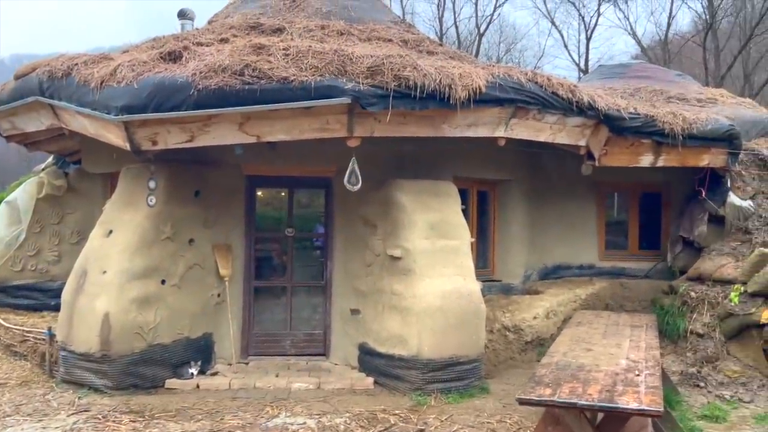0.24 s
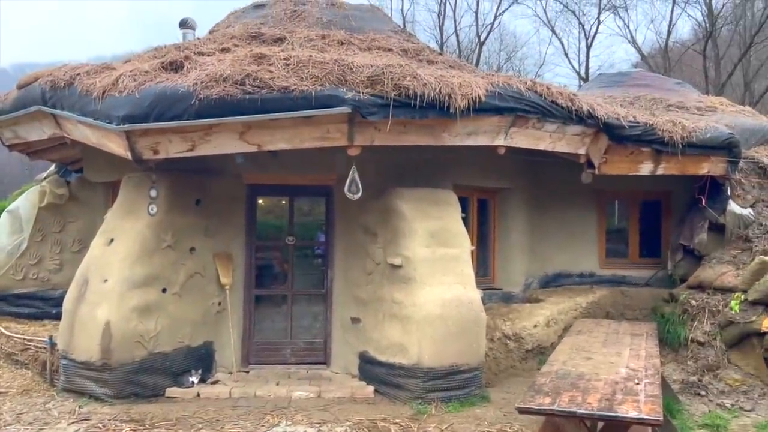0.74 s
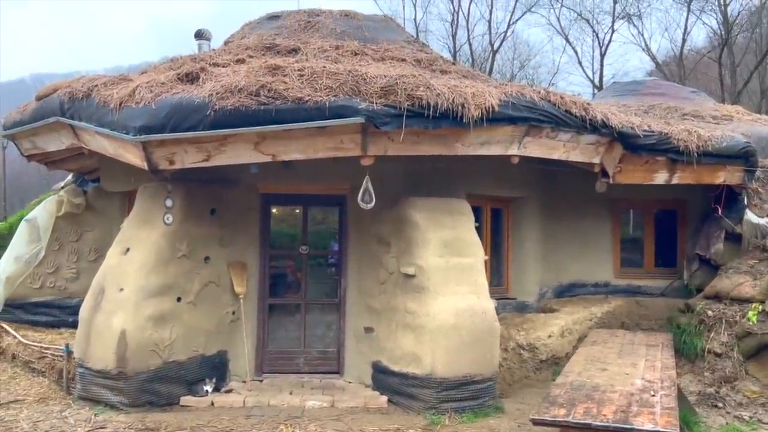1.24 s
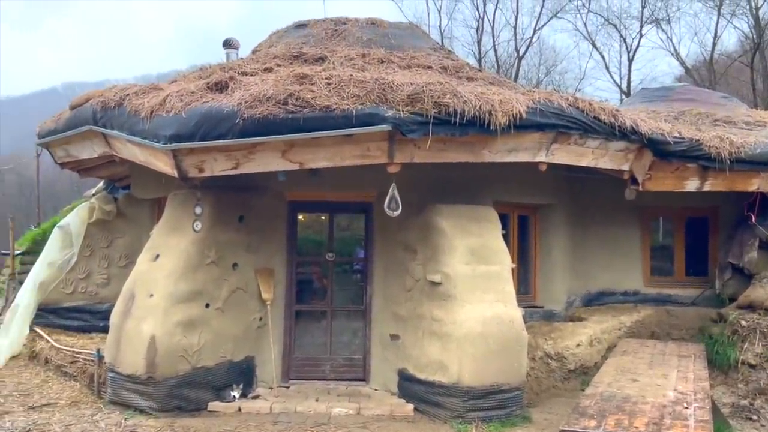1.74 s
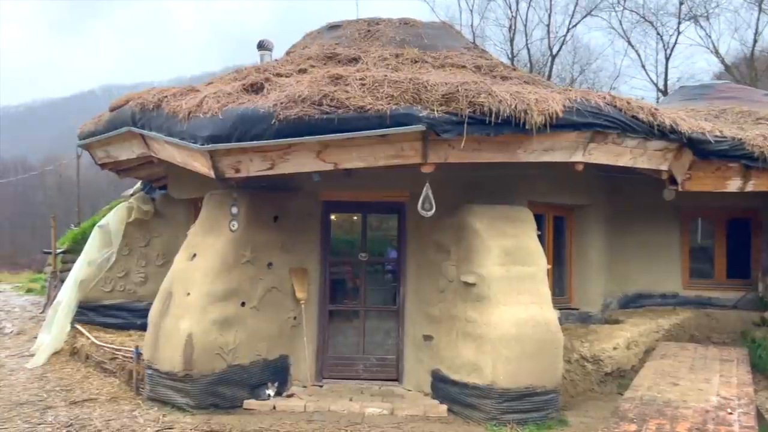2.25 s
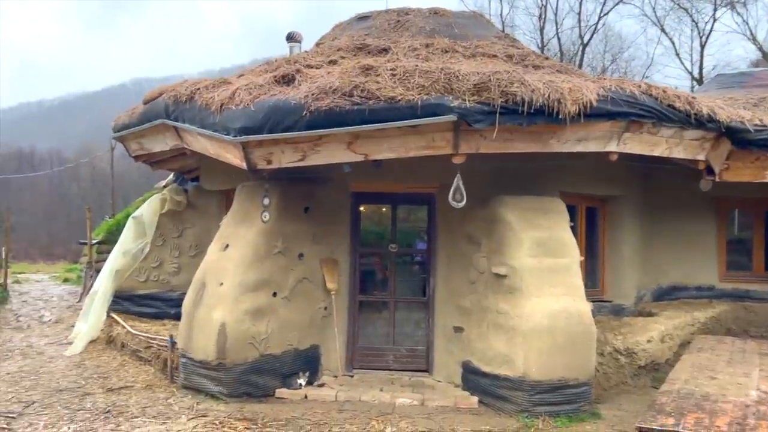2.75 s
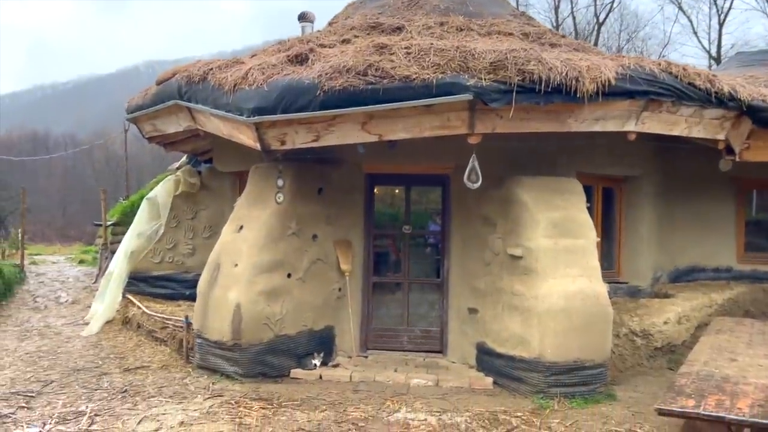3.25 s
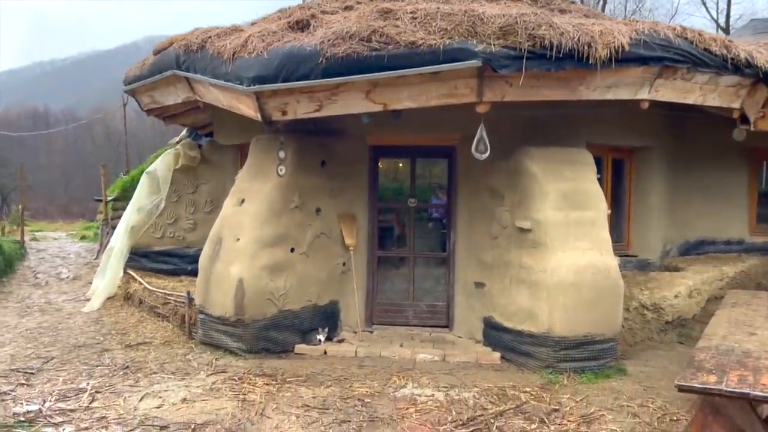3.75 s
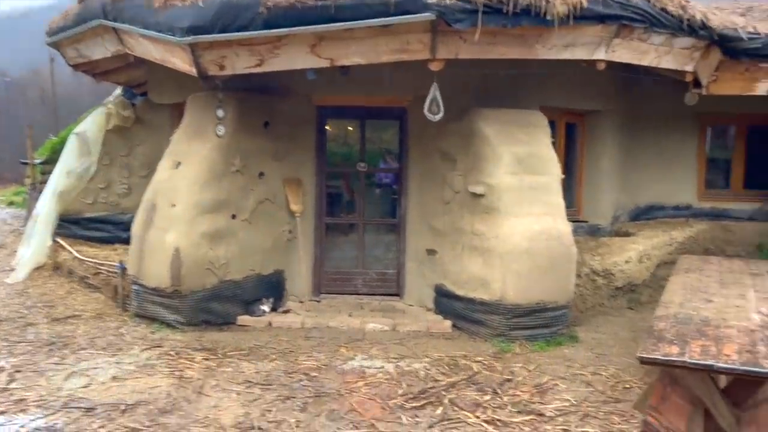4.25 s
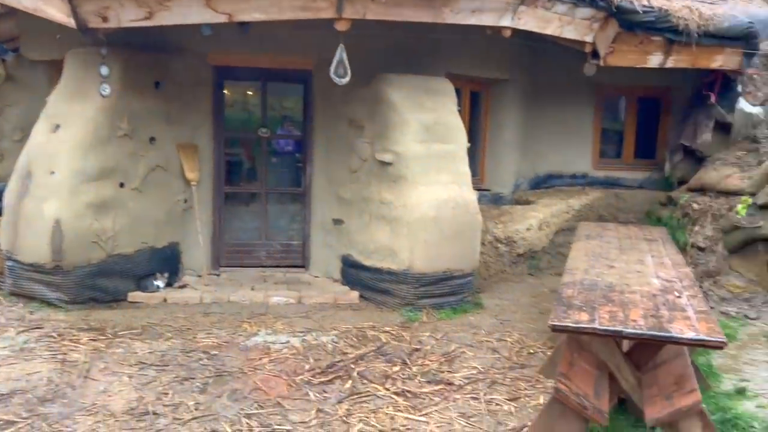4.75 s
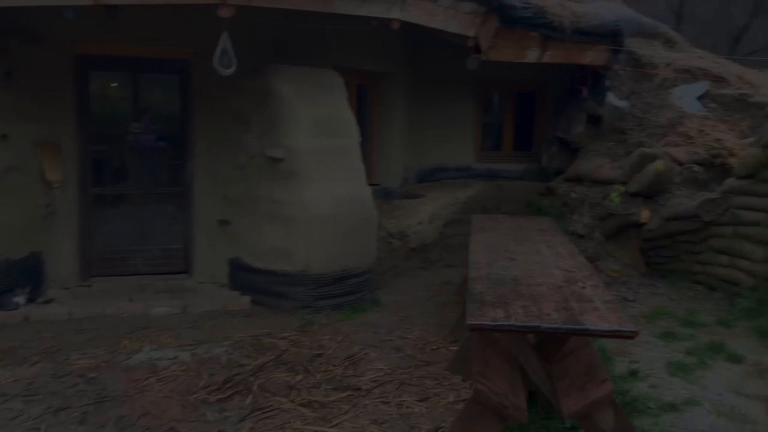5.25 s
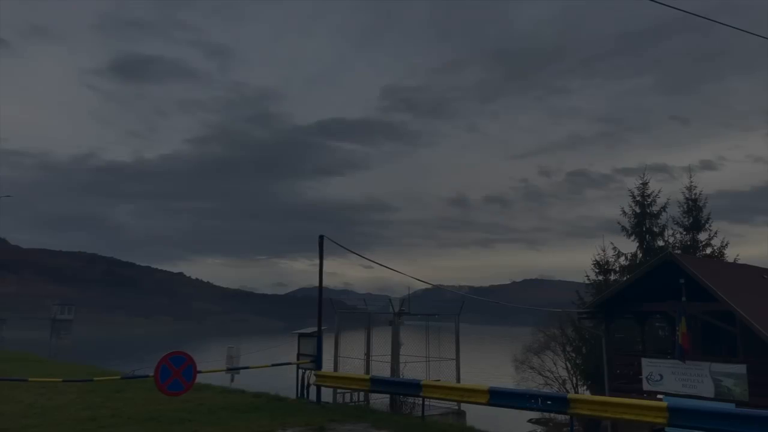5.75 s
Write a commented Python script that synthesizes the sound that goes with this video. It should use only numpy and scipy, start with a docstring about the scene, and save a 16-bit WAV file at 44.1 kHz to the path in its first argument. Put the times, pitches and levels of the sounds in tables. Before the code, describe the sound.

Close steps on wet, straw-strewn mud in a quiet yard. Faint low thumps and crisp wet ticks come first, then a heavy hollow step at two seconds. Wind bumps the microphone mid-way. A sole drags with a swish and squelch before another firm step, then again around the next. A last step lands as a broad outdoor wash flicks in, dips and swells.

```python
"""Someone walks over wet, straw-strewn mud outdoors. From the start, noise makes a soft air hiss and wind rumble,
with slow swings for wind buffets and a faint crackling hiss for settling straw. Footfalls begin at once: ringing
sine waves and lumpy, dying noise. Wet ticks soon follow, short snaps with a fizz; then come dull pops of one swing,
the second over a short low thump built like a footfall, and squelches of narrow noise. From 3.6 s a dragged sole
swishes twice in patchy, crackling noise. Near the end a broad outdoor wash of noise bursts briefly, dips and swells."""
import sys
import numpy as np
from scipy import signal
from scipy.io import wavfile

SR = 44100
rng = np.random.default_rng(int(sys.argv[2]) if len(sys.argv) > 2 else 0)


def dump_mix(stems):
    """Bounce the given channels to the path in sys.argv[1] as a 16-bit WAV at rate SR."""
    frames = np.atleast_2d(stems).T  # one column per channel
    limited = np.clip(frames, -1, 1)  # hard clip at full scale
    pcm = np.round(limited * 32767).astype(np.int16)
    wavfile.write(sys.argv[1], SR, pcm)


N = 264600   # samples: 6 s

# Colour of the still outdoor air: (pitch [Hz], relative level [dB per Hz])
AIR_COLOUR = [(59, -23.5), (100, -7.5), (141, -9.5), (263, -6), (330, -13), (641, -14.5), (1370, -18),
              (1500, -18.5), (2330, -16.5), (4110, -28), (5160, -35.5), (7120, -29.5), (9280, -36.5),
              (12100, -68), (20400, -120)]
AIR_DB = -69.5
# Loudness of the late wash: (time [s], level [dB])
WASH_LEVEL = [(5.45, -52), (5.484, -83), (5.608, -57.5), (5.824, -52), (6.0, -50.5)]
# Colour of the late wash: (pitch [Hz], relative level [dB per Hz])
WASH_COLOUR = [(59, -30), (100, -2.5), (194, -7.5), (295, -4.5), (356, -16.5), (666, -3), (1390, -8),
               (3330, -20.5), (5890, -19), (9280, -34), (12100, -94), (20400, -120)]
# How alike left and right are for far sounds, held to -1..1: (pitch [Hz], likeness [-])
FAR_ALIKE = [(60, 1), (210, 0.36), (730, -0.6), (2540, 0.15), (8830, -1.2)]
# The same for near sounds: (pitch [Hz], likeness [-])
NEAR_ALIKE = [(60, 0.76), (250, 1), (700, 0.41), (3000, 0.43), (9000, 0.55)]

# Wind on the microphone, before the lumps: (time [s], rumble level [dB])
WIND_LEVEL = [(0, -73), (.9, -75), (1.7, -72), (2.3, -59.5), (2.6, -56), (3.0, -58.5), (3.3, -66.5),
              (3.8, -49.5), (4.05, -59.5), (4.7, -67), (5.1, -60.5), (5.4, -64), (6, -69)]
# Colour of the wind rumble: (pitch [Hz], relative level [dB per Hz])
RUMBLE_COLOUR = [(12, -42), (20, -16), (47, 12.5), (70, 7.5), (123, -7), (168, -17), (219, -23),
                 (252, -43.5), (400, -59), (520, -73), (880, -120)]
LUMPY_DB, LUMPS_PER_S = 5.5, 8.3   # spread and rate of the wind's lumps
# Stronger buffets, a few slow swings each:
# (time of the middle [s], level [dB], half length [s], swing rate before the wobble [Hz])
BUFFETS = [(0.203, -52, 0.011, 89.6), (0.786, -62, 0.023, 64.6), (1.025, -59, 0.024, 79),
           (1.207, -58, 0.018, 63.5), (1.739, -54, 0.034, 66.9), (2.243, -68, .035, 56.3),
           (2.331, -48.5, 0.023, 59), (2.449, -41.5, 0.035, 57.5), (2.544, -39.5, 0.034, 76.1),
           (2.579, -33, 0.021, 65.6), (2.633, -37.5, 0.007, 70.1), (2.729, -44, 0.036, 65.9),
           (2.917, -42, 0.035, 58), (3.158, -51.5, 0.017, 61.4), (3.447, -53, 0.031, 59.7),
           (3.524, -41, 0.037, 74.9), (3.607, -48.5, 0.09, 59.4), (3.749, -36.5, 0.028, 67.7),
           (3.802, -35, 0.016, 72), (3.868, -32.5, 0.014, 78), (3.917, -45, 0.021, 52),
           (4.28, -56.5, .025, 64), (4.451, -54.5, .025, 66.7), (4.93, -45.5, 0.045, 64.5),
           (5.125, -58, 0.032, 65), (5.196, -50, 0.013, 61.3), (5.744, -55.5, 0.019, 77.6),
           (5.912, -54, 0.036, 74.9)]

# Settling straw, before its crackle: (time [s], level [dB])
RUSTLE_LEVEL = [(0.0, -81.5), (2.2, -79.5), (2.32, -84.5), (3.5, -79), (4.07, -69), (5.1, -76),
                (5.4, -72.5), (5.6, -70)]
# Dull pops in the mud: (time [s], peak level [dB], centre [Hz], left-right difference [dB])
POPS = [(1.844, -48.5, 1450, 10), (2.9957, -46.5, 502, -5)]
# Air squeezed out of the mud:
# (time of the peak [s], level [dB], centre [Hz], length [s], left-right difference [dB])
SQUELCHES = [(2.217, -71, 4300, 0.019, 0), (3.705, -64, 4000, 0.017, 2), (3.821, -71, 1070, 0.055, 18),
             (3.941, -56, 1640, 0.029, 13.5), (3.955, -55.5, 3380, 0.039, 4),
             (4.006, -54, 3230, 0.0076, -11), (4.285, -75, 6400, 0.034, -8.5),
             (4.941, -59.5, 3800, 0.04, 1), (5.05, -66, 1639, 0.027, 17), (5.187, -75, 5930, 0.011, -8)]

# The dragged sole, one list per drag: (time [s], level [dB])
DRAG_LEVELS = [
    [(3.62, -87), (3.7, -66.5), (3.76, -69), (3.79, -59), (3.9, -60.5), (3.95, -53), (4.04, -51.5),
     (4.16, -79)],
    [(4.84, -60.5), (4.92, -57), (4.95, -51), (4.99, -57), (5.12, -66), (5.16, -72.5)],
]
# Colour of the drag: (pitch [Hz], relative level [dB per Hz])
SWISH_COLOUR = [(290, -49), (500, -14), (921, -5.5), (1280, -9.5), (1540, -11.5), (2390, -7.5), (3200, -9),
                (4920, -13), (7180, -10.5), (9280, -41), (12100, -67), (20400, -120)]
# Stalks crackle on their own between these: (edge [Hz])
STALK_EDGES_HZ = [2000, 3300, 4700, 6500]
STALKS_PER_S, STALK_DB, STALK_S = 300, 1.0, .003   # catches, their strength and dying time
DRAG_PAN_DB, TICK_PAN_DB = 1, 1.5   # left-right difference

# Wet ticks: (time [s], snap level [dB], centre [Hz], relative width [-], fizz against snap [dB],
# time for the fizz to fall 60 dB [s])
TICKS = [(0.351, -41, 7100, 0.51, -11, 0.2), (0.384, -48.5, 4860, 0.66, -18, 0.35),
         (0.4148, -37.5, 7060, 0.29, -27, 0.14), (0.743, -54.5, 6340, 0.31, -8.5, 0.16),
         (1.2189, -41.5, 6420, 0.34, -26, 0.24), (1.276, -61.5, 5550, 0.31, -10.5, 0.2),
         (1.452, -53.5, 5450, 0.15, -22, 0.19), (1.605, -54, 5860, 0.32, -16, 0.11),
         (1.725, -54.5, 5050, 0.43, -16.5, 0.21), (2.2098, -55, 4060, 0.38, -19, 0.25),
         (2.6773, -49.5, 6000, 0.18, -14.5, 0.27), (2.7225, -55.5, 4310, 0.066, -11, 0.15),
         (2.76, -55.5, 4400, 0.19, -15, 0.25), (2.811, -58, 6000, 0.37, -4.5, 0.27),
         (2.826, -43, 6760, .18, -32, 0.36), (3.1968, -65.5, 3233, .17, -9.5, 0.16),
         (3.5752, -61.5, 2670, 0.32, -22.5, 0.15), (3.606, -67, 4630, 0.21, -7.5, 0.15),
         (3.629, -41, 6900, 0.24, -30, 0.24), (3.879, -51.5, 3300, 0.28, -4, 0.11),
         (4.432, -39, 6730, 0.28, -30, 0.18), (4.574, -59.5, 3600, 0.2, -8.5, 0.11),
         (4.8533, -37.5, 4260, 0.12, -12.5, 0.2), (5.2351, -43, 6320, 0.35, -24, 0.11)]

# Footfalls, and at 2.993 s the short low thump under a dull pop:
# (time [s], level before colouring [dB], extra bass [dB], extra brightness [dB],
# upper edge of the thud [Hz], straw crunch against thud [dB], decay factor [-], left-right difference [dB])
THUDS = [(0.112, -67.5, 41.5, 3, 3000, -37, 0.41, 0.5), (0.957, -44.5, 4.5, -22, 3000, -49, 1.15, 1),
         (1.346, -56, 22, -4.5, 3000, -40, 1, 1), (1.591, -51, 16.5, -8.5, 3000, -40, 1.27, 0.5),
         (2.017, -16, 3.5, 0.5, 3490, -33.5, 0.95, 0.5), (2.753, -58, 32, -3, 3500, -35, 0.81, 5),
         (2.993, -44, 24, -12, 3500, -35, 0.2, 0), (4.032, -24.5, 3, 6.5, 3200, -39.5, 1.064, 1.5),
         (4.795, -25, 1.5, 5, 2910, -38, 1.125, 0.5), (5.44, -22.5, -8.5, -1.5, 2540, -27, 1.01, 1)]
# Colour of the thud: (pitch [Hz], level [dB], share of extra bass [-], share of extra brightness [-])
THUD_COLOUR = [(60, -12, .8, 0.5), (120, -11.5, 0.99, 0.12), (223, -16, 0.72, 0.052),
               (547, 0.5, 0.013, 0.15), (1141, -4, 0.028, 1.2), (1900, -12.5, 0.11, 0.51),
               (2694, -14.5, 0.2, 0.47), (5420, -21.5, 0.12, 1.2)]
EDGE_DB_PER_OCTAVE = 43   # fall above the thud's upper edge
# Colour of the straw crunch in the thuds: (pitch [Hz], level [dB])
STRAW_COLOUR = [(2000, -18.5), (3800, -0.5), (5400, 2), (7600, -0.5), (10700, -24.5)]
# Hollow ring of the ground: (pitch [Hz], level [dB], 60 dB fall time before the decay factor [s])
GROUND = [(65, -1.5, 0.46), (81.6, 4, 0.29), (119.1, 3.5, 0.27), (181.7, 10.5, 0.11), (226.6, 2.5, 0.27),
          (287.3, 2, 0.17), (339.8, 2.5, 0.081), (393, -14.5, 0.18), (445.4, -1, 0.16),
          (500.5, -4.5, 0.044), (654, -10.5, 0.17), (676, -1.5, 0.074), (763, -11.5, 0.24),
          (846, -11, 0.13), (1057.6, -7, 0.23), (1215, -19.5, 0.36), (1427, -14.5, 0.078)]
# Crunch level next to the ring: (pitch [Hz], level [dB])
CRUNCH_LEVEL = [(60, -12), (1100, -12), (1600, -9), (8000, -9), (12000, -14)]
# Time for the crunch to fall 60 dB, before the decay factor: (pitch [Hz], time [s])
CRUNCH_T60 = [(60, 0.23), (160, 0.5), (420, 0.27), (1100, 0.3), (2900, 0.27), (7700, 0.27)]
# Build-up of the thud, slower in the lows: (pitch [Hz], time [s])
THUD_RISE = [(60, 0.031), (400, 0.0089), (3000, 0.0064)]
KNOTS_DB, KNOT_S = 2, .008   # the mud gives way in lumps: swing and length

DROOP_HZ, DROOP_DB = 8800, -17   # the microphone loses this much above here
PORT_LAG = 1.2   # samples by which the left port hears later
CUTOFF_HZ = 15900


def amp(db):
    """Turn decibels into a gain."""
    return 10 ** (np.asarray(db) / 20)


def rms_one(x):
    """Scale a sound so its average strength (rms) is 1."""
    return x / np.sqrt(np.mean(x ** 2) + 1e-20)


def level_over_time(rows):
    """Draw a (time, dB) table as a gain that is all but silent outside the table."""
    s, db = np.transpose(rows)
    padded_s = [s[0] - .03, *s, s[-1] + .03]
    return amp(np.interp(np.arange(N) / SR, padded_s, [-120, *db, -120]))


def at_hz(points, hz):
    """Read a table at a pitch, with straight lines between points on a log-pitch axis."""
    points = np.array(points)
    return np.interp(np.log(hz), np.log(points[:, 0]), points[:, 1])


def sides(pan_db):
    """Left and right gains, as a column."""
    return amp(np.array([[pan_db / 2], [-pan_db / 2]]))


def drift(rate):
    """Random wandering of spread 1: noise smoothed by a two-step low-pass at this rate in Hz."""
    hop = 40   # samples between drawn points
    r = np.exp(-2 * np.pi * rate * hop / SR)
    white = rng.standard_normal(N // hop + 2002)
    slow = signal.lfilter([1], [1, -2 * r, r * r], white)[2000:]   # skip the start-up
    return np.interp(np.arange(N) / hop, np.arange(len(slow)), rms_one(slow))


def bandpass(x, low, high, order):
    """Keep only the pitches between two edges."""
    return signal.sosfilt(signal.butter(order, [low, high], "band", fs=SR, output="sos"), x)


def bands(likeness, size, low_hz=22, top_hz=13000, order=3):
    """Half-octave bands of stereo noise, flat per Hz: yields (centre Hz, band)."""
    edges = low_hz * 2 ** np.arange(0, np.log2(top_hz / low_hz), .5)
    white = rng.standard_normal((2, 2, size + 4000))
    for k, (low, high) in enumerate(zip(edges, edges[1:])):
        # neighbouring bands use different noise; the filter's start-up is skipped
        mid, side = bandpass(white[k % 2], low, high, order)[:, 4000:]
        hz = np.sqrt(low * high)
        alike = np.clip(at_hz(likeness, hz), -1, 1)
        yield hz, np.sqrt(1 + alike) * mid + np.sqrt(1 - alike) * side * [[1], [-1]]


def noise(spectrum, likeness, patchy_db, flicker, low_hz, top_hz):
    """Coloured noise whose bands flicker partly together; rms 1."""
    together = drift(flicker)
    total = 0
    for hz, band in bands(likeness, N, low_hz, top_hz):
        patches_db = patchy_db * (together + drift(flicker))
        total = total + band * amp(at_hz(spectrum, hz) + patches_db)
    return rms_one(total)


def grit(per_s, db, decay_s):
    """Crackle as a gain: the level jumps at random moments and quickly falls back each time."""
    caught = (rng.random(N) < per_s / SR) * np.minimum(rng.exponential(1, N), 2)
    return 1 + amp(db) * signal.lfilter([1], [1, -np.exp(-1 / (decay_s * SR))], caught)


def add(out, s, sound):
    """Mix a sound in at a time."""
    i = round(s * SR)
    out[:, i:i + sound.shape[1]] += sound[:, :N - i]


def still_air():
    """The outdoor background is a steady, gently flickering noise."""
    return amp(AIR_DB) * noise(AIR_COLOUR, FAR_ALIKE, patchy_db=.5, flicker=12, low_hz=60, top_hz=13000)


def late_wash():
    """A broad noise follows its level table near the end."""
    hiss = noise(WASH_COLOUR, FAR_ALIKE, patchy_db=.4, flicker=12, low_hz=90, top_hz=13000)
    return level_over_time(WASH_LEVEL) * hiss


def wind(square=3.0, wobble=0.15, overtone_db=-14, apart=0.25):
    """A lumpy rumble; each buffet rocks the diaphragm through a few uneven swings."""
    lumps = level_over_time(WIND_LEVEL) * amp(LUMPY_DB * drift(LUMPS_PER_S))
    out = lumps * noise(RUMBLE_COLOUR, NEAR_ALIKE, patchy_db=-1.0, flicker=24, low_hz=20.13, top_hz=500)
    t = np.arange(-SR // 8, SR // 8) / SR
    uneven = 1 + wobble * drift(16.8)
    for s, db, half_s, hz in BUFFETS:
        start, left, right = rng.standard_normal(3)
        i = round((s + t[0]) * SR)
        speed = np.resize(uneven[i:i + len(t)], len(t))
        # left and right swing slightly out of step
        phase = 2 * np.pi * (start + hz * np.cumsum(speed) / SR) + apart * np.array([[left], [right]])
        swing = np.sin(phase) + amp(overtone_db) * np.sin(2 * phase + start)
        fade = np.exp(-np.abs(t / half_s) ** square)
        add(out, s + t[0], amp(db) * swing * fade)
    return out


def rustle():
    """Trodden straw settles with a faint, crackling treble hiss."""
    tone = [(3000, 5.0), (4500, 1.0), (7000, -2.5), (9000, -16.5)]   # (pitch [Hz], relative level [dB per Hz])
    hiss = noise(tone, NEAR_ALIKE, patchy_db=1.5, flicker=9, low_hz=2700, top_hz=12000)
    return level_over_time(RUSTLE_LEVEL) * rms_one(hiss * grit(25, 5.8, 0.0016))


def pops(cycles=0.26):
    """A pocket of air bursts: one short swing of pressure."""
    out, t = np.zeros((2, N)), np.arange(-200, 600) / SR
    for s, db, hz, pan_db in POPS:
        swing = np.cos(2 * np.pi * hz * t) * np.exp(-np.abs(t) * hz / cycles)
        add(out, s + t[0], amp(db) * sides(pan_db) * swing)
    return out


def squelches(width=0.12):
    """Air squeezes out of the mud: noise through the small opening's resonance, swelling and fading."""
    out, t = np.zeros((2, N)), np.arange(-SR // 8, SR // 8) / SR
    for s, db, hz, length, pan_db in SQUELCHES:
        white = rng.standard_normal((3, len(t)))
        white = white[0] + white[1:] / 2   # one shared noise plus a little of each side's own
        hiss = rms_one(bandpass(white, hz / (1 + width), hz * (1 + width), order=2))
        add(out, s + t[0], amp(db) * sides(pan_db) * hiss * np.exp(-(t / length) ** 2))
    return out


def drags():
    """The sole slides over wet straw: a patchy swish; caught stalks crackle, each in its own range."""
    swish = noise(SWISH_COLOUR, NEAR_ALIKE, patchy_db=-1.0, flicker=37, low_hz=361, top_hz=18000)
    under = [signal.sosfilt(signal.butter(4, hz, "low", fs=SR, output="sos"), swish) for hz in STALK_EDGES_HZ]
    out = under[0]   # the lowest range has no crackle
    for low, high in zip(under, under[1:] + [swish]):
        crackle = rms_one(grit(STALKS_PER_S, STALK_DB, STALK_S))
        out = out + (high - low) * crackle
    level = sum(level_over_time(rows) for rows in DRAG_LEVELS)
    return sides(DRAG_PAN_DB) * level * rms_one(out)


def ticks(spread=2.3, late_s=0.000735, skirt_db=-14):
    """A sharp snap of a bursting film of water, then a short fizz, both around the tick's own pitch."""
    out, t = np.zeros((2, N)), np.arange(SR // 4) / SR
    since_snap = t - late_s
    for s, db, hz, width, fizz_db, t60 in TICKS:
        # a wider band, a shorter snap
        snap = np.cos(2 * np.pi * hz * since_snap) * np.exp(-(since_snap * spread * width * hz) ** 2)
        snap[round(late_s * SR)] += 1   # the film tears at once: a broad click
        white = rng.standard_normal((3, len(t)))
        white = white[0] + white[1:] / 3   # one shared noise plus a little of each side's own
        near = rms_one(bandpass(white, hz / (1 + width), hz * (1 + width), order=3))
        fade = amp(fizz_db - 60 * t / t60) * np.minimum(t / late_s, 1)
        fizz = (near + amp(skirt_db) * white) * fade
        add(out, s, amp(db) * sides(TICK_PAN_DB) * (snap + fizz))
    return out


def footfalls_and_thump(lead_s=0.0062, linger=1.17):
    """Footfalls, and the thump under a pop: ringing ground modes and lumpy noise that dies band by band."""
    out, t = np.zeros((2, N)), np.arange(SR // 2) / SR
    for s, db, bass_db, bright_db, edge_hz, straw_db, slow, pan_db in THUDS:
        body = [(hz, base_db + low * bass_db + high * bright_db) for hz, base_db, low, high in THUD_COLOUR]

        def colour(hz):
            """Strength of the thud's body and straw together at a pitch."""
            over_edge_db = EDGE_DB_PER_OCTAVE * max(np.log2(hz / edge_hz), 0)
            return np.hypot(amp(at_hz(body, hz) - over_edge_db), amp(straw_db + at_hz(STRAW_COLOUR, hz)))

        def swell(hz, t60):
            """Quick build-up, then the sound dies away."""
            rise = 1 - np.exp(-(t / at_hz(THUD_RISE, hz)) ** 2)
            return rise * amp(-60 * (t / (t60 * slow)) ** linger)

        thud = 0
        for hz, band in bands(NEAR_ALIKE, len(t), low_hz=50, order=4):
            knots = np.interp(t / KNOT_S, np.arange(200), rng.standard_normal(size=200))
            lumpy = rms_one(band) * amp(at_hz(CRUNCH_LEVEL, hz) + KNOTS_DB * knots)
            thud = thud + lumpy * colour(hz) * swell(hz, at_hz(CRUNCH_T60, hz))
        for hz, mode_db, t60 in GROUND:
            # left and right are slightly apart in phase; the strength varies a little
            phase = rng.uniform(0, 2 * np.pi) + rng.normal(0, 0.17, (2, 1))
            strength = colour(hz) * amp(mode_db + rng.normal(0, 1.5))
            thud = thud + strength * np.sin(2 * np.pi * hz * t + phase) * swell(hz, t60)
        add(out, s - lead_s, amp(db) * sides(pan_db) * thud)
    return out


def scene():
    """Footfalls, a low thump and wet straw and mud over wind rumble, still air and the late wash."""
    background = still_air() + late_wash() + wind()
    mud_and_straw = rustle() + pops() + squelches() + drags() + ticks()
    return background + mud_and_straw + footfalls_and_thump()


def record(dry):
    """The left port hears slightly later; the treble droops and the top is cut."""
    turn = (1 - PORT_LAG) / (1 + PORT_LAG)   # an all-pass filter as a short delay
    late = np.stack([signal.lfilter([turn, 1], [1, turn], dry[0]), dry[1]])
    under = signal.sosfilt(signal.butter(8, DROOP_HZ, "low", fs=SR, output="sos"), late)
    over = signal.sosfilt(signal.butter(8, DROOP_HZ, "high", fs=SR, output="sos"), late)
    drooped = under + amp(DROOP_DB) * over
    return signal.sosfilt(signal.cheby2(12, 70, CUTOFF_HZ, fs=SR, output="sos"), drooped)


dry = scene()
out = record(dry)
dump_mix(out)
```